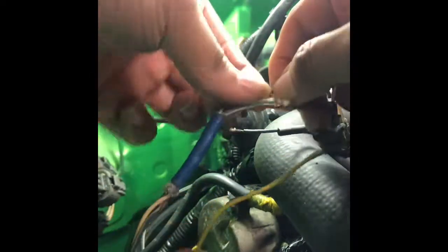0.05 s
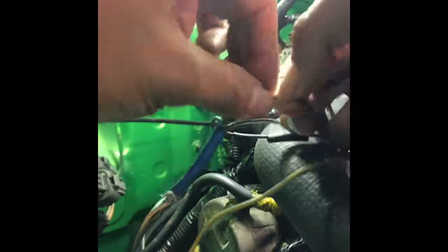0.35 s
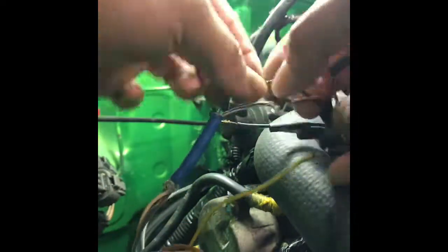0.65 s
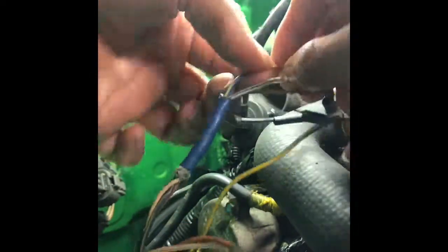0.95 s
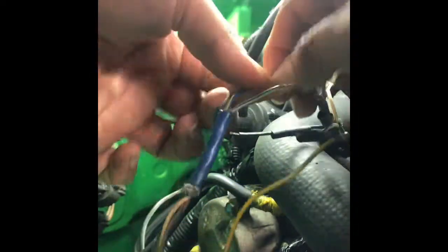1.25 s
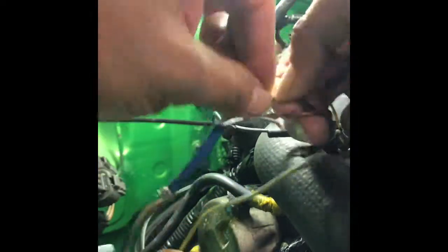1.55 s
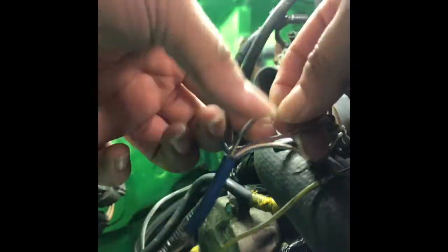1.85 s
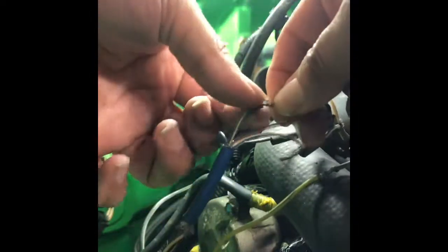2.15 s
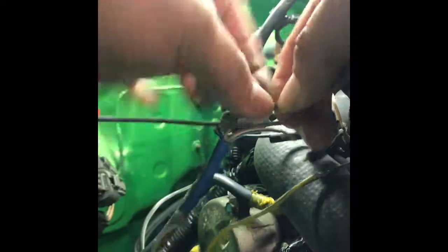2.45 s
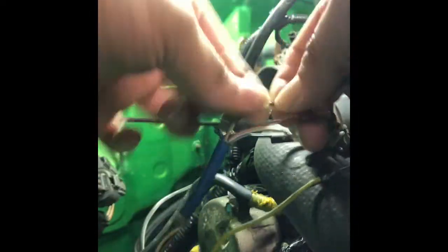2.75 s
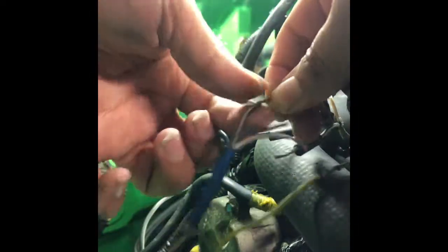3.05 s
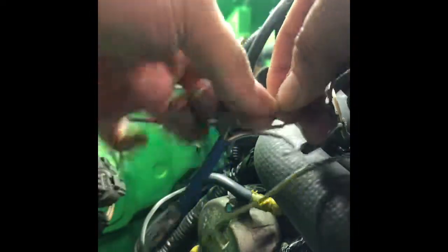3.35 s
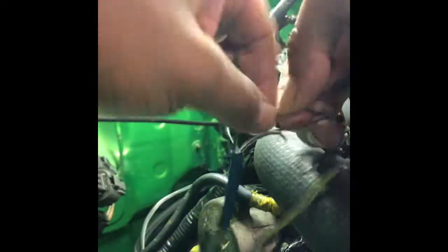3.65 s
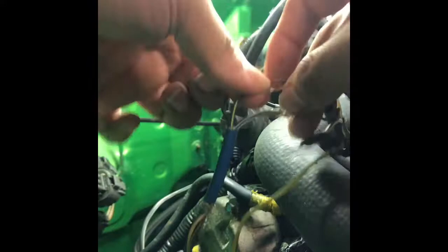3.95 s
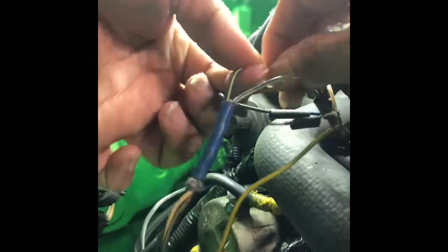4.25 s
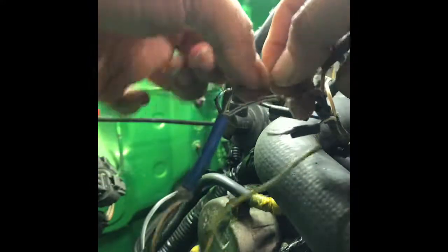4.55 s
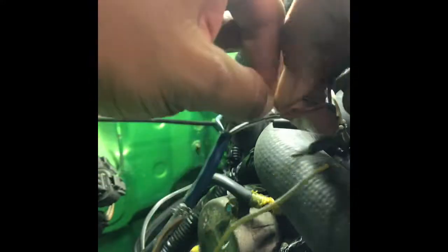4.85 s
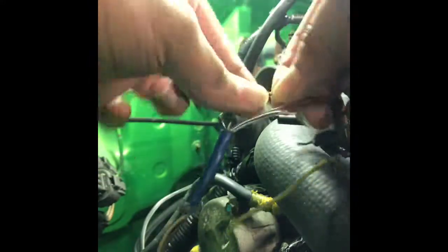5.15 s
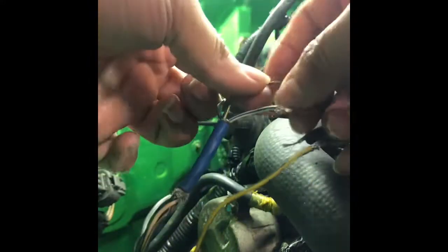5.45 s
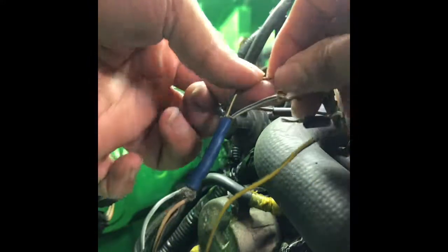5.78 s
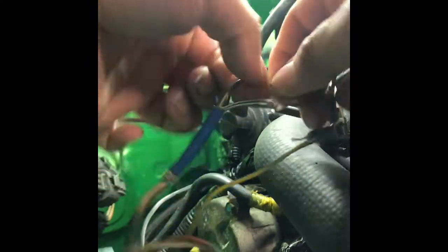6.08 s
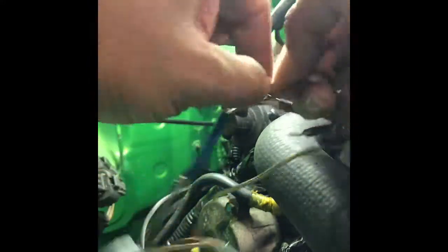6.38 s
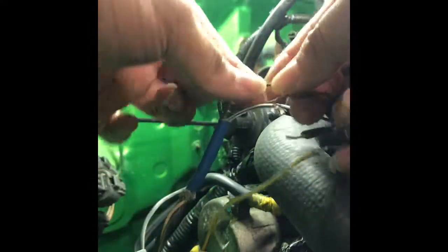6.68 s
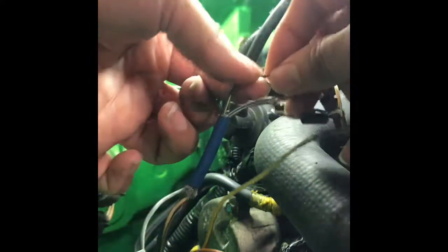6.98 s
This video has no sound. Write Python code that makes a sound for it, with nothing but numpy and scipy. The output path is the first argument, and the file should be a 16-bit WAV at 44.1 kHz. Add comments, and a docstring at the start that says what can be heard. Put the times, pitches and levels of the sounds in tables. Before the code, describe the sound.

Fingers twist bare copper wires with small ticks, scratches and ringing taps on metal, over a faint motor hum.

```python
"""In a garage, fingers twist bare copper wire ends together over an engine's wiring loom, close by.
Fingertips rustle on the copper, strands tick and scratch as they slip, and free ends spring loose and ping.
The moving wires tap metal parts, making both ring, and once something knocks and rattles to rest.
Underneath, air rushes softly and a distant motor, perhaps a fan, hums, sags in speed and picks up again."""
import sys
import numpy as np
from scipy import signal
from scipy.fft import rfft, irfft
from scipy.io import wavfile
from scipy.ndimage import uniform_filter1d

SR = 44100
rng = np.random.default_rng(int(sys.argv[2]) if len(sys.argv) > 2 else 0)


def unload_audio(sound):
    """Save the sound as a 16-bit wav file, at the path given as the first command line argument."""
    columns = np.transpose(np.atleast_2d(sound))
    # keep every value between -1 and 1, then stretch to whole-number steps
    steps = np.round(np.clip(columns, -1, 1) * 32767)
    wavfile.write(sys.argv[1], SR, steps.astype(np.int16))


N = 318402
T = np.arange(int(.3 * SR)) / SR  # the clock of one short sound [s]

# a knock and its bounces: (time [s], hollow body [dB], crack [dB], crack's brightness [dB per octave])
KNOCK_HITS = [(3.6919, -62, -52, 9), (3.6979, -22, -23, -0.5), (3.7605, -33, -41.5, -3),
              (3.7879, -35.5, -51, -3), (3.8115, -43, -57, -3), (3.829, -40.5, -65, 5),
              (3.855, -39, -53.5, -7), (3.874, -46.5, -65, 5)]


def from_db(db):
    """Turns decibels into a factor to multiply by."""
    return 10 ** (np.asarray(db) / 20)


def value_at(points, hz):
    """Looks up hz in a table of (frequency, value), blending between rows on a log-frequency scale."""
    freqs, values = np.transpose(points)
    return np.interp(np.log(hz + 1), np.log(freqs), values)


def unit_level(x, span=None):
    """Scales a sound to an average (rms) level of 1, over its first span seconds if given."""
    head = x if span is None else x[:int(span * SR)]
    return x / np.sqrt(np.mean(head ** 2) + 1e-20)


def add(mix, s, sound):
    """Lays a sound into the mix at s seconds."""
    part = mix[max(round(s * SR), 0):][:len(sound)]
    part += sound[:len(part)]


def coloured(x, spectrum):
    """Makes each frequency louder or softer, following a table of (frequency [Hz], level [dB])."""
    gain = from_db(value_at(spectrum, np.fft.rfftfreq(len(x), 1 / SR)))
    return irfft(rfft(x) * gain, len(x))


def drift(rate_hz):
    """A random wobble of size 1, mostly slower than rate_hz."""
    keep_slow = np.exp(-(np.fft.rfftfreq(N, 1 / SR) / rate_hz) ** 2)
    return unit_level(irfft(rfft(rng.standard_normal(N)) * keep_slow, N))


def burst(t60):
    """A puff of noise; t60 is the time in seconds it takes to fade by 60 dB."""
    return rng.standard_normal(len(T)) * from_db(-60 * T / t60)


def resonance(x, hz, q):
    """Rings one mode, a pitch at which an object likes to vibrate; a higher q rings longer."""
    return signal.lfilter(*signal.iirpeak(hz, q, SR), x)


def steep_modes(x, modes):
    """Rings several modes, filtering twice so that little is left between them."""
    return sum(from_db(db) * unit_level(resonance(resonance(x, hz, q), hz, q)) for hz, q, db in modes)


def ring(modes, detune, vary_db):
    """The fading tones of a struck object; each blow lands on a new spot, so they vary a little."""
    hz, db, t60 = np.transpose(modes)[:, :, None]
    shift, weight = rng.uniform(-1, 1, (2, len(hz), 1))
    sign = (-1) ** np.arange(len(hz))[:, None]  # neighbouring modes start in opposite directions
    fade = from_db(db + vary_db * weight - 60 * T / t60)
    return (sign * fade * np.sin(2 * np.pi * hz * (1 + detune * shift) * T)).sum(0)


def snap(spectrum, tilt_db, scatter, t60):
    """A sharp click and its scatter off nearby fingers and parts, together having the given colour."""
    hz = abs(np.fft.fftfreq(1024, 1 / SR))
    spray = burst(t60)
    spray *= scatter / np.linalg.norm(spray)
    spray[0] += 1  # the click itself
    spray_power = uniform_filter1d(abs(np.fft.fft(spray, len(hz))) ** 2, size=11, mode="wrap")
    colour_db = value_at(spectrum, hz) + tilt_db * np.log2(np.maximum(hz, 2000) / 2000)
    log_gain = np.log(from_db(colour_db) / np.sqrt(spray_power))
    pulse = np.fft.ifft(np.exp(np.conj(signal.hilbert(log_gain)))).real  # energy packed at the start
    return signal.fftconvolve(spray, pulse)[:len(T)]


def air(flicker_db=1.0):
    """Moving air makes a soft, low rush whose level flickers slightly."""
    # colour of the rush: (frequency [Hz], level in a 1 Hz band [dB])
    rush_colour = [(22, -105), (33, -98), (55, -82), (95, -73), (180, -77), (310, -78), (450, -85.5),
                   (590, -87), (730, -93), (1550, -94.5), (2400, -100.3), (3200, -100), (6100, -106.3),
                   (9500, -114.5), (14000, -116), (15300, -113), (16000, -123)]
    rush = coloured(rng.standard_normal(N), rush_colour) * np.sqrt(SR / 2)
    return rush * from_db(flicker_db * drift(rate_hz=22.0))


def motor(waver=0.54, waver_hz=4):
    """Four turning blades hum; the shaft adds weaker, wavering tones that follow the same speed."""
    # the motor's speed: (time [s], blade pitch [Hz])
    speed_curve = [(0, 103.8), (0.5, 104.5), (0.85, 106.5), (4.45, 106.1), (4.8, 105.2), (5.4, 102),
                   (6.65, 108.1), (7.2, 107.2)]
    # rise and fall of the blade tone: (time [s], level [dB])
    blade_curve = [(0, -56.5), (1.0, -53), (1.45, -52.5), (1.8, -46.5), (2.2, -50.5), (3.5, -49.5),
                   (3.9, -47.5), (5.0, -49), (5.45, -51), (6.2, -45.5), (7.2, -49)]
    # rise and fall of the tone an octave above: (time [s], level [dB])
    octave_curve = [(0, -55), (0.33, -68), (0.6, -55), (1.1, -52), (2.4, -56.5), (3.25, -51.5), (4.1, -57),
                    (4.6, -46.5), (4.87, -47), (5.4, -83), (6.2, -57), (6.75, -74), (7.2, -54.5)]
    # the shaft's tones: (multiple of the blade pitch, level [dB])
    shaft_tones = [(3 / 4, -67.5), (5 / 4, -60), (6 / 4, -62), (10 / 4, -67.5), (11 / 4, -64.5),
                   (14 / 4, -73), (16 / 4, -74.5), (20 / 4, -73.5), (22 / 4, -70)]
    t = np.arange(N) / SR
    hz = np.interp(t, *np.transpose(speed_curve))
    blade_db = np.interp(t, *np.transpose(blade_curve)) + 1.2 + drift(rate_hz=10)
    octave_db = np.interp(t, *np.transpose(octave_curve)) + 0.24
    third_db = -64 + 6.5 * drift(rate_hz=0.97)
    angle = 2 * np.pi * np.cumsum(hz) / SR
    out = np.zeros(N)
    for multiple, db in enumerate([blade_db, octave_db, third_db], start=1):
        out += from_db(db) * np.sin(multiple * angle + 2 * np.pi * rng.random())
    for multiple, db in shaft_tones:
        turn = multiple * angle + 2 * np.pi * rng.random()
        tone = (0.71 + waver * drift(waver_hz)) * np.sin(turn) + waver * drift(waver_hz) * np.cos(turn)
        out += from_db(db) * tone
    return np.sqrt(2) * out


def garage_echo(x, onset_s=0.0027, dull_hz=7500):
    """The garage throws sound back as a short, dull wash whose treble dies before its middle."""
    # how long the garage rings: (frequency [Hz], fade time t60 [s])
    fade_times = [(300, 0.23), (800, 0.4), (3000, 0.13), (7000, 0.14), (15000, 0.2)]
    hz, t, noise = signal.stft(rng.standard_normal(SR // 2), SR, nperseg=256)
    tail = signal.istft(noise * from_db(-60 * t / value_at(fade_times, hz)[:, None]), SR)[1]
    tail *= 1 - np.exp(-(np.arange(len(tail)) / SR / onset_s) ** 2)
    dull = signal.lfilter(*signal.butter(1, dull_hz, fs=SR), x)
    return signal.fftconvolve(dull, tail / np.linalg.norm(tail))[:N]


def rattle(below_knock_db=25, contacts_per_s=700, t60=0.13, growth=0.7):
    """Each knock shakes loose metal into a spray of tiny contacts; even a light one stirs it."""
    # the loose metal's modes: (pitch [Hz], sharpness Q, level [dB])
    metal_modes = [(1020, 4, 0), (1590, 7, -2.5), (2000, 6, 2), (3540, 30, -5), (3940, 28, -1),
                   (4600, 30, -5)]
    out = np.zeros(N)
    hardest_db = max(row[1] for row in KNOCK_HITS)
    for s, body_db, _, _ in KNOCK_HITS:
        contacts = rng.choice([-1, 1], len(T)) * (rng.random(len(T)) < contacts_per_s / SR)
        spray = sum((-1) ** k * from_db(db) * unit_level(resonance(contacts, hz, q))
                    for k, (hz, q, db) in enumerate(metal_modes))
        start_db = hardest_db - below_knock_db + growth * (body_db - hardest_db)
        add(out, s, unit_level(spray) * from_db(start_db - 60 * T / t60))
    return out


def knocks(lag_s=0.00141, rise_s=0.0006, chatter_db=-13.5, chatter_t60=0.21):
    """A blow gives a hard crack; the hollow body swells just after it, and loose parts chatter on."""
    # the hollow part's modes: (pitch [Hz], level [dB], fade time t60 [s])
    body_modes = [(293, -17, 0.1), (403, -7.5, 0.023), (506, -13.5, 0.14), (604, 6, 0.035), (663, 1, 0.055),
                  (714, 2, 0.035), (782, 1.5, 0.058), (920, -12, 0.073), (1110, -11, 0.027),
                  (1326, -17.5, 0.061), (1573, -13, 0.052)]
    # colour of the crack: (frequency [Hz], level [dB])
    crack_colour = [(200, -18), (900, -6), (1500, -5), (2000, -1), (2600, -4), (3200, -2.5), (3500, 2),
                    (3700, 0), (3950, 4.5), (4250, 0), (4600, 5.5), (5000, -4), (5400, 0.5), (5800, -5),
                    (6400, 2.5), (8000, -9), (8700, -5), (9600, -12), (13000, -11), (15700, -13),
                    (17000, -40)]
    out = np.zeros(N)
    hollow = signal.butter(2, [540, 1000], "band", fs=SR, output="sos")
    for s, body_db, crack_db, tilt_db in KNOCK_HITS:
        crack = snap(crack_colour, tilt_db, scatter=5.9, t60=0.017)
        add(out, s, from_db(crack_db) * unit_level(crack, span=0.013))
        body = ring(body_modes, detune=0.018, vary_db=2.5) * (1 - np.exp(-T / rise_s))
        chatter = unit_level(signal.sosfilt(hollow, rng.standard_normal(len(T))))
        chatter *= from_db(chatter_db - 60 * T / chatter_t60)
        add(out, s + lag_s, from_db(body_db) * (unit_level(body, span=0.011) + chatter))
    return out


def rubs(grain_db=3.2, clump_db=2.1, clump_s=.004, firm_db=-56, low_growth=1.9):
    """Skin sticks and slips on the wire in clumps of tiny grains, which rustle and set it ringing."""
    # finger strokes: (time [s], length [s], rustle [dB], ring [dB], upper mode [Hz], its sharpness Q)
    strokes = [(0.214, 0.21, -65.5, -90, 6050, 11), (3.433, 0.065, -69, -57, 6150, 12),
               (3.46, 0.029, -55, -54, 6060, 8), (3.482, 0.092, -65, -65, 6600, 16),
               (3.86, 0.21, -70, -73, 6150, 11), (4.18, 0.076, -68, -71, 6050, 18),
               (4.525, 0.025, -76, -61, 6000, 20), (5.551, 0.22, -71, -72, 6050, 11),
               (5.571, .06, -73, -67, 6000, 25), (5.785, 0.062, -78, -63, 5930, 15),
               (5.858, .042, -82, -65.5, 5975, 25), (6.096, 0.14, -73, -75, 6050, 11),
               (6.842, 0.097, -67.5, -71, 6150, 22), (7.087, 0.059, -82, -66, 5900, 40)]
    # colour of skin rubbing on copper: (frequency [Hz], level [dB])
    rustle_colour = [(500, -24), (2500, -5), (4000, -1), (7000, 1), (10000, 0), (14000, 2), (15800, 0),
                     (17000, -30)]
    # the wire's lower modes: (pitch [Hz], sharpness Q, level [dB])
    lower_modes = [(2000, 1.6, -7), (3720, 5.5, 0.5)]
    out = np.zeros(N)
    for s, length, rustle_db, ring_db, upper_hz, upper_q in strokes:
        size = int(length * SR)
        clumps = unit_level(uniform_filter1d(rng.standard_normal(size), int(clump_s * SR)))
        grains = rng.standard_normal(size)
        grains *= from_db(grain_db * np.minimum(rng.exponential(1, size), 5) + clump_db * clumps)
        stroke = from_db(rustle_db) * unit_level(coloured(grains, rustle_colour))
        stroke += from_db(ring_db) * unit_level(resonance(grains, upper_hz, upper_q))
        lower_db = firm_db + low_growth * (ring_db - firm_db)  # these catch up in a firm stroke
        stroke += from_db(lower_db) * steep_modes(grains, lower_modes)
        pressure = np.sin(np.pi * (np.arange(size) / size) ** 1.2)  # builds, then lets go
        add(out, s, stroke * pressure)
    return out


def scratches():
    """As the twist tightens, a strand jumps over its neighbour and rings the wire with a gritty burst."""
    # the jumps: (time [s], level [dB])
    jumps = [(5.686, -68), (5.7419, -66), (5.757, -59), (5.8178, -51), (5.838, -47.5), (5.852, -55),
             (6.117, -61), (6.8678, -68), (7.0439, -65)]
    # a jumping strand's modes: (pitch [Hz], sharpness Q, level [dB])
    strand_modes = [(2030, 3, -4), (3750, 5, -10), (5750, 5.5, -0.5)]
    out = np.zeros(N)
    for s, db in jumps:
        scratch = steep_modes(burst(t60=0.011), strand_modes)
        add(out, s, from_db(db) * unit_level(scratch, span=0.0048))
    return out


def ticks(faint_per_s=4, faint_db=-71.5):
    """Single strands slip over each other with dry, bright ticks; fainter ones fall at random between."""
    # the clear slips: (time [s], level [dB], brightness [dB per octave])
    slips = [(.116, -59, 6), (.5517, -56, 0), (.681, -50, 1), (1.8229, -61, 3), (2.2135, -53.5, 11),
             (2.3816, -62, 5), (2.4928, -63, 6), (3.5435, -57, -7), (4.4413, -53, 7), (4.7722, -26, 0),
             (5.1588, -60.5, 6), (5.8182, -57.5, -2), (5.8383, -54, -2.5), (6.3546, -52.5, 1),
             (6.6339, -58, 8)]
    # colour of a tick: (frequency [Hz], level [dB])
    tick_colour = [(200, -26), (1100, -11), (1700, -2), (2400, 1), (3000, -1), (4300, 2), (7500, -1),
                   (10000, 0), (12500, -5), (15000, 4.5), (15900, 1), (17000, -35)]
    out = np.zeros(N)
    faint = [(when * N / SR, faint_db + 4 * np.log(strength + 0.11), 5)
             for when, strength in rng.random((int(faint_per_s * N / SR), 2))]
    for s, db, tilt_db in list(slips) + faint:
        tick = snap(tick_colour, tilt_db, scatter=1.8, t60=0.009)
        add(out, s, from_db(db) * unit_level(tick, span=0.0068))
    return out


def pings(rise_s=.0012, damp_s=.012, waver_hz=90):
    """A wire end springs loose and sings, wavers as it grazes its neighbours, and the fingers damp it."""
    # springing ends: (time [s], level [dB], pitch [Hz], fade time t60 before damping [s])
    loose_ends = [(3.5428, -57, 3750, 0.01), (4.272, -56, 5930, 0.032), (4.503, -40.5, 5950, 0.043),
                  (4.5165, -55, 3540, .025), (6.4774, -46.5, 6050, 0.04)]
    out = np.zeros(N)
    for s, db, hz, t60 in loose_ends:
        waver = waver_hz * unit_level(uniform_filter1d(rng.standard_normal(len(T)), size=80))
        fade = from_db(-60 * T / t60) * (1 - np.exp(-T / rise_s)) * np.exp(-(T / damp_s) ** 2)
        tone = fade * np.sin(2 * np.pi * np.cumsum(hz + waver) / SR)
        add(out, s, from_db(db) * unit_level(tone, span=0.0074))
    return out


def taps(attack_s=0.0053, low_attack_s=0.0083):
    """Wire hits metal: the part rings and clatters in three low bands, the wire in three high ones."""
    # the taps: (time [s], wire level [dB], wire brightness [dB per octave], part level [dB],
    #   part brightness [dB per octave], wire pitch ratio set by the grip, four spot mode levels [dB])
    hits = [(0.0536, -38.5, -5.5, -42.5, 0, 0.98, -9, 2, -6.5, 6.5),
            (1.3532, -30, -2, -40.5, -4, 1.005, -5, 0, 0, 0),
            (1.3682, -43.5, -3, -61, 3.5, 1.04, -9, 2, 1, 2),
            (1.4578, -42.5, -6, -52, -1, 1.02, -4, -12, -21, 0),
            (1.4698, -53, -2, -64, 3.5, 0.97, -10, -8, -7, 2),
            (4.2699, -59, -11.5, -54.5, -11, 1.0, -2, -4, 0.5, 5),
            (4.4685, -35, 0, -40, -5, 1.04, -10, 0, 3, 3),
            (4.4872, -46, -11, -42, -6, 1.015, -12, -6, 4.5, 1),
            (4.5003, -48.5, 0.5, -59, -1, 0.98, -12, 1, 5.5, 0),
            (4.5255, -60, -12, -73, 8, .97, -6, -3, -1, -4),
            (6.476, -53, -4.5, -51, 1, 0.98, 4.5, -3, -8, 5)]
    # modes of part and wire: (pitch [Hz], level [dB], fade time t60 [s])
    tap_modes = [(625, 4, 0.058), (680, -1.5, 0.063), (771, -7.5, 0.092), (1346, 8, 0.15), (1580, 4, 0.12),
                 (2024, 7.5, 0.017), (2673, -5, 0.056), (3040, -2.5, 0.057), (3630, 5.5, 0.011),
                 (3780, 9, 0.018), (4210, -9.5, 0.028), (4520, -12, 0.027), (5530, -9.5, 0.012),
                 (5910, -11.5, 0.019), (6150, -4.5, 0.017), (6330, -4.5, 0.0094), (6760, -10, 0.0088),
                 (7570, -21, 0.0081), (8540, 10, 0.012), (9880, 12, 0.012), (11060, 12, 0.012),
                 (12000, 10, 0.013), (13000, 12, 0.014), (13600, 8, 0.011)]
    # modes whose strength depends on the spot struck: (pitch [Hz], sharpness Q)
    spot_modes = [(1356, 12), (1597, 12), (3750, 7), (5530, 13)]
    # borders between the six bands: (frequency [Hz])
    borders = [1000, 1750, 3300, 5000, 7800]
    modes = np.array(tap_modes)
    band_of_mode = np.searchsorted(borders, modes[:, 0])
    edges = [450] + borders + [14000]
    clatter_gains = [.3, .4, .8, .45, .5, .8]
    part_octaves = np.log2(np.array(borders[:3]) / borders[0])
    wire_octaves = np.log2(np.array(borders[2:]) / borders[3])
    out = np.zeros(N)
    for s, wire_db, wire_tilt, part_db, part_tilt, pitch, *spot_dbs in hits:
        part_levels = part_db + part_tilt * part_octaves + [-0.5, -3, 1]
        wire_levels = wire_db + wire_tilt * wire_octaves + [0.5, 2, -1.5]
        tap = np.zeros(len(T))
        for k, db in enumerate([*part_levels, *wire_levels]):
            band = signal.butter(3, edges[k:k + 2], "band", fs=SR, output="sos")
            clatter = signal.sosfilt(band, burst(t60=0.025))
            tuned = modes[band_of_mode == k] * [pitch if k > 2 else 1, 1, 1]  # grip tunes only the wire
            tone = ring(tuned, detune=.002 * (k + 1), vary_db=2)
            blend = unit_level(tone, attack_s) + clatter_gains[k] * unit_level(clatter, attack_s)
            tap += from_db(db) * unit_level(blend, attack_s if k > 1 else low_attack_s)
        for (hz, q), db in zip(spot_modes, spot_dbs):
            tap += (from_db(db) - 1) * resonance(tap, hz, q)
        add(out, s, tap)
    return out


def scene():
    """Handwork close by with a faint echo, the motor and the air farther off."""
    hands = taps() + pings() + knocks() + rattle() + ticks() + rubs() + scratches()
    return (hands + from_db(-14.0) * garage_echo(hands) + motor() + air())[None]


def record(dry):
    """Cuts away the very highest treble."""
    low_pass = signal.firwin(255, cutoff=15950, window=("kaiser", 8), fs=SR)
    return signal.oaconvolve(dry, low_pass[None], "same")


dry = scene()
out = record(dry)
unload_audio(out)
```